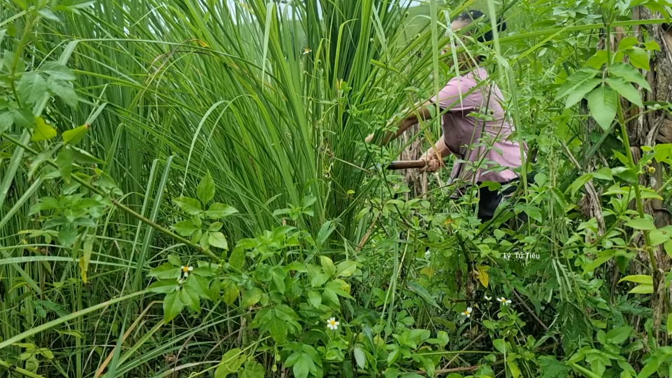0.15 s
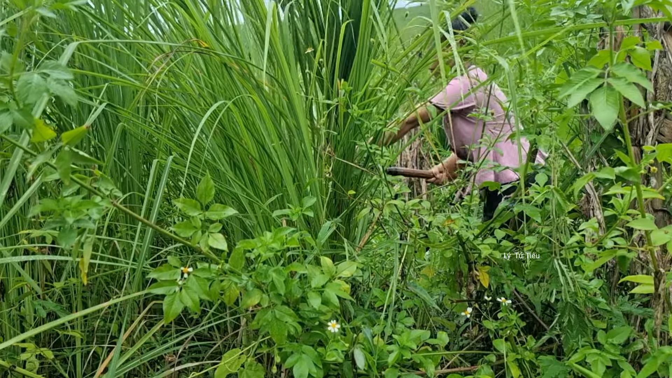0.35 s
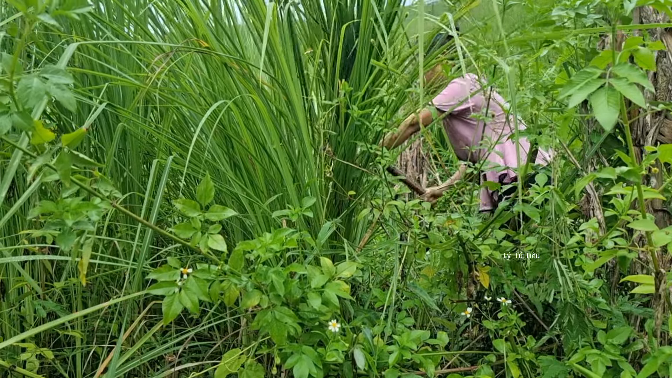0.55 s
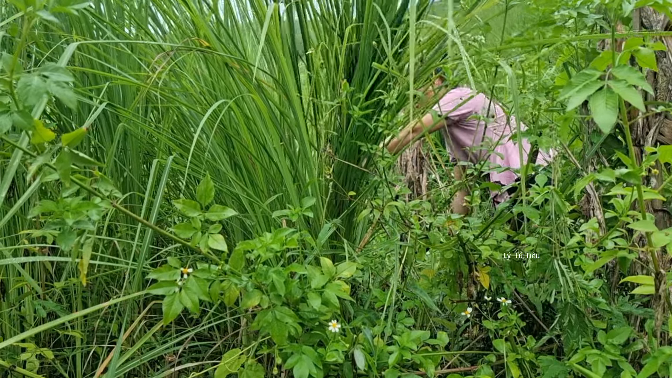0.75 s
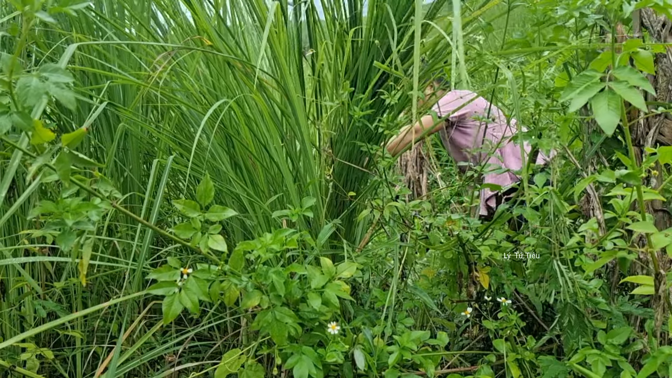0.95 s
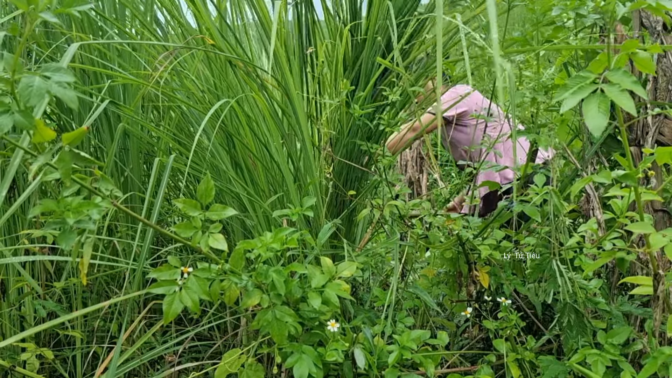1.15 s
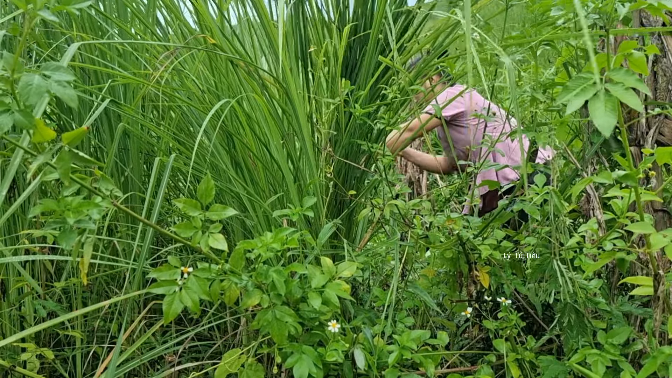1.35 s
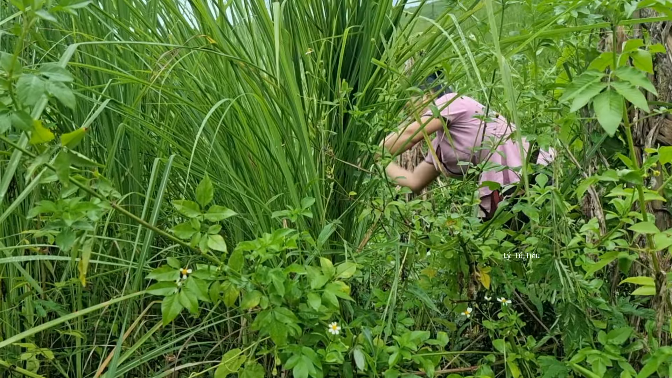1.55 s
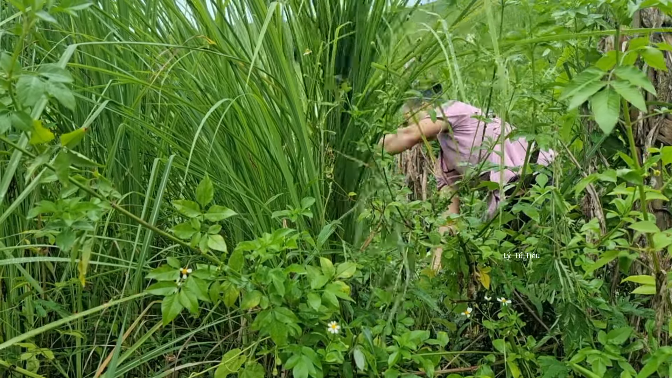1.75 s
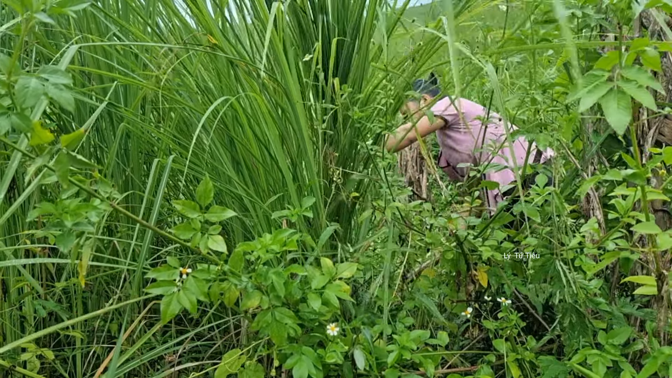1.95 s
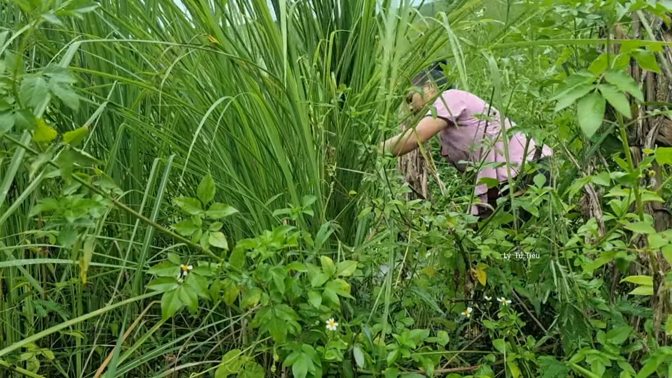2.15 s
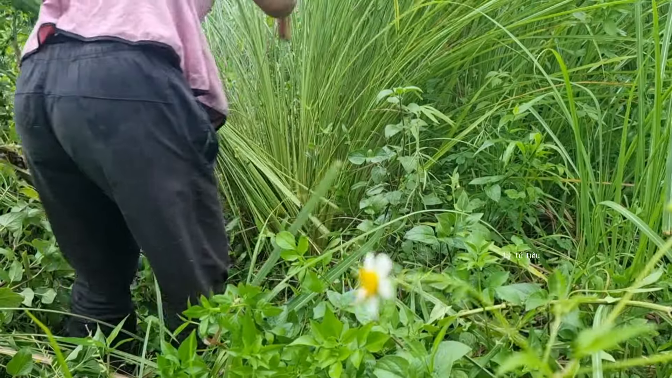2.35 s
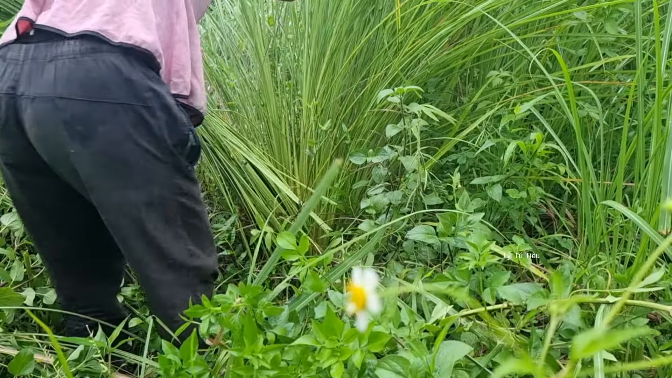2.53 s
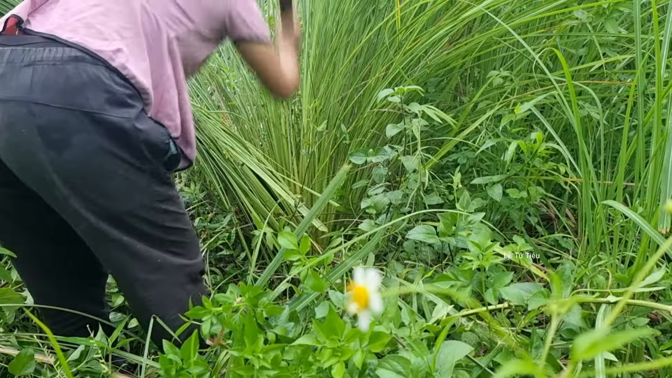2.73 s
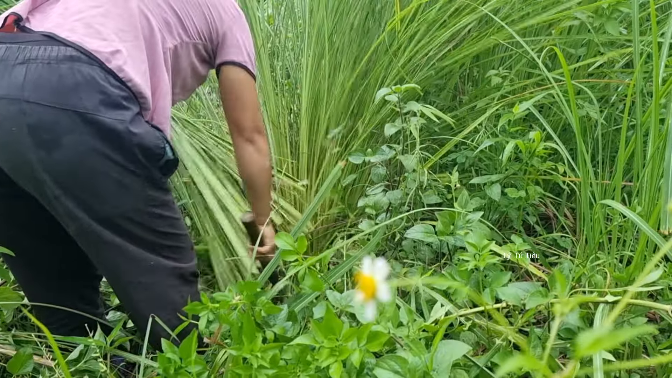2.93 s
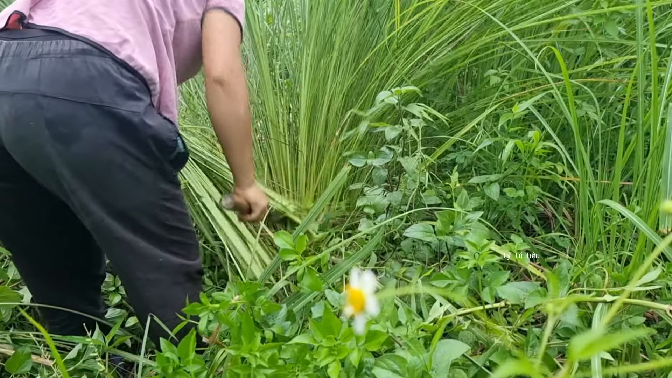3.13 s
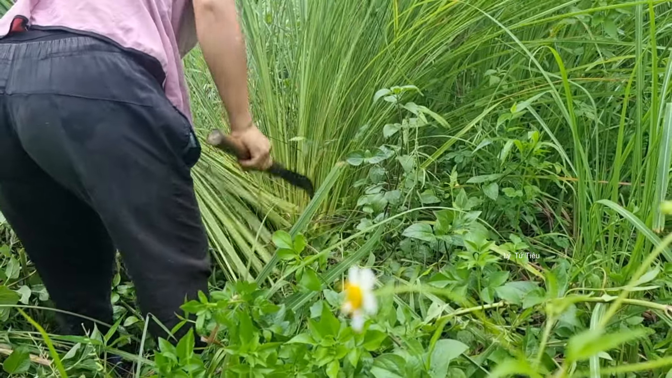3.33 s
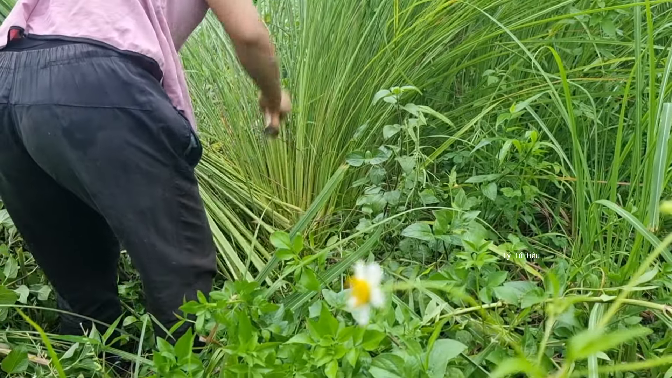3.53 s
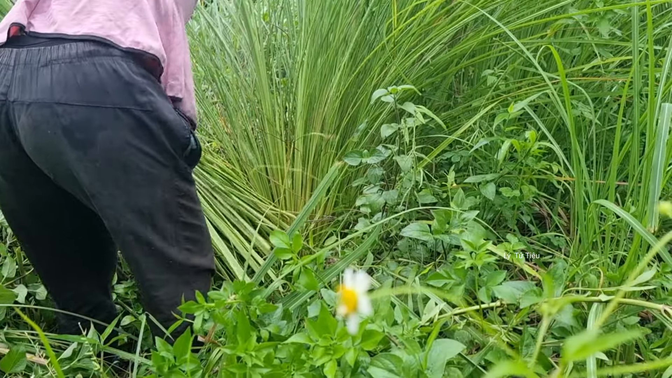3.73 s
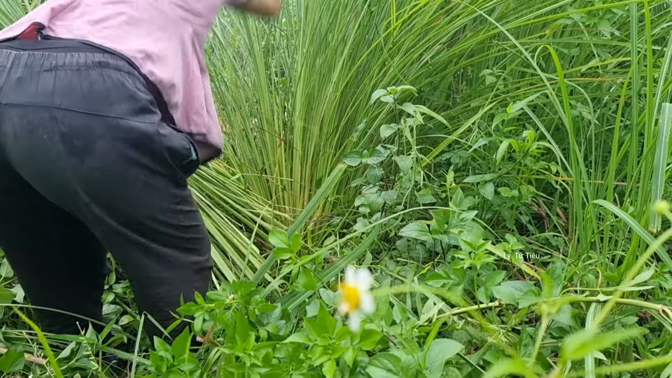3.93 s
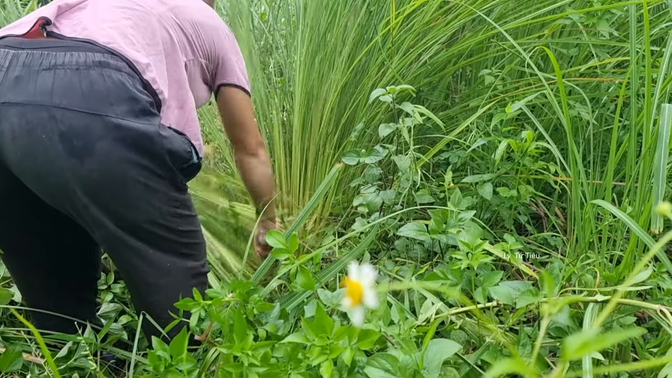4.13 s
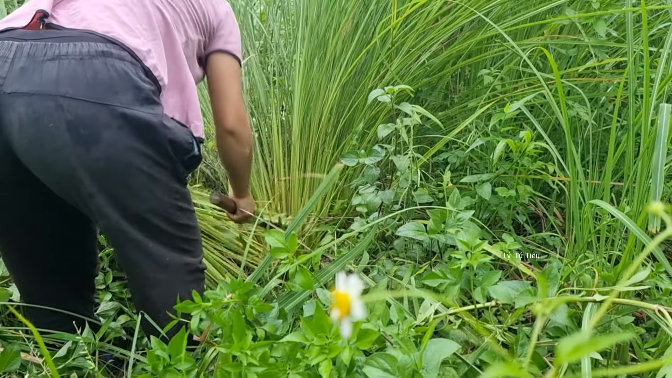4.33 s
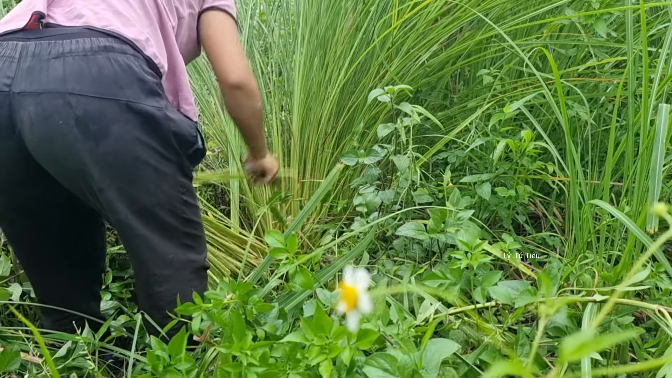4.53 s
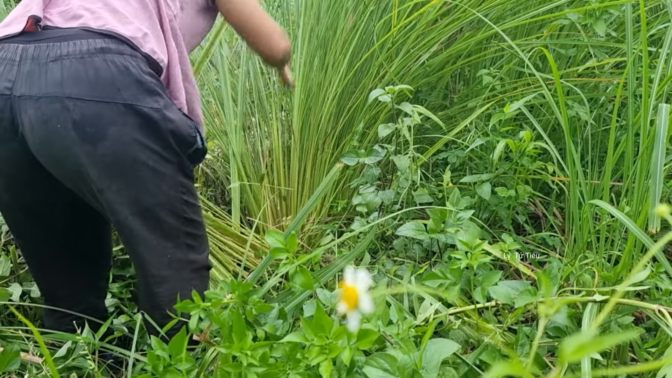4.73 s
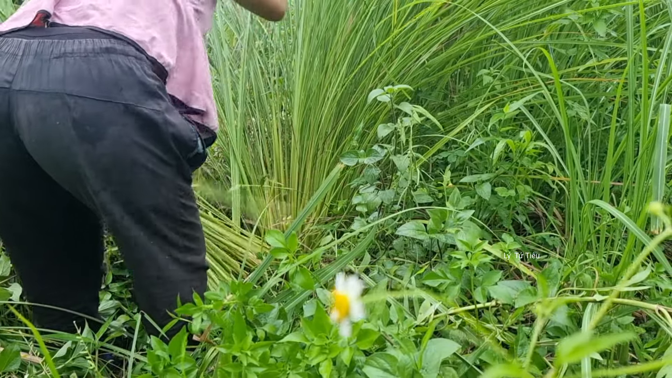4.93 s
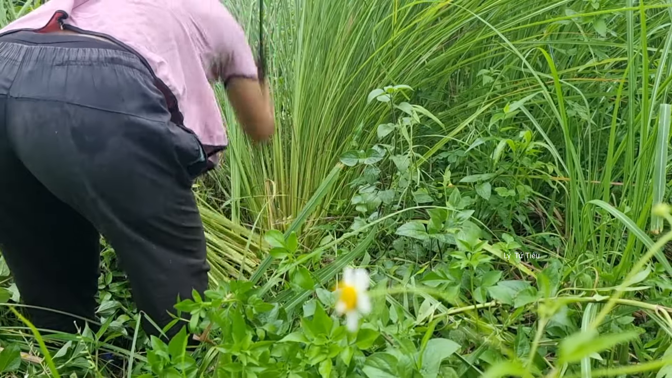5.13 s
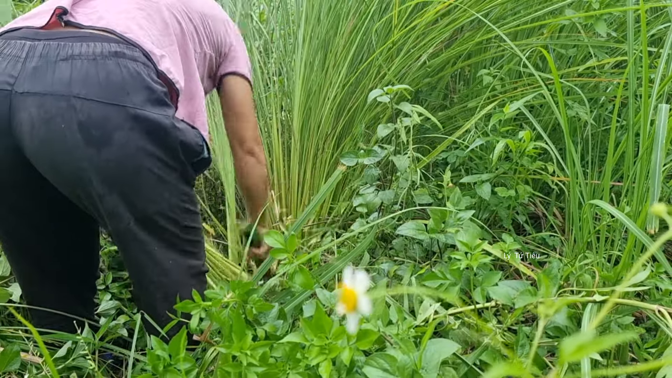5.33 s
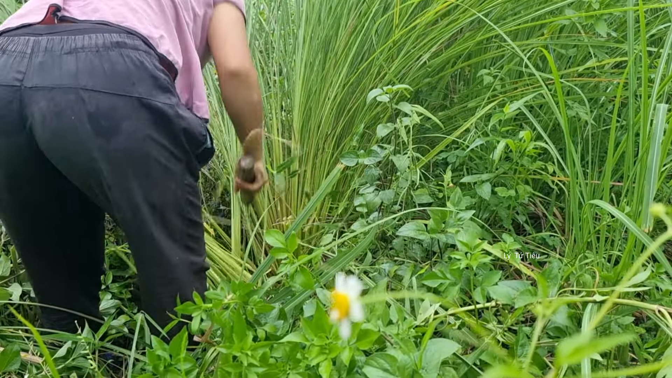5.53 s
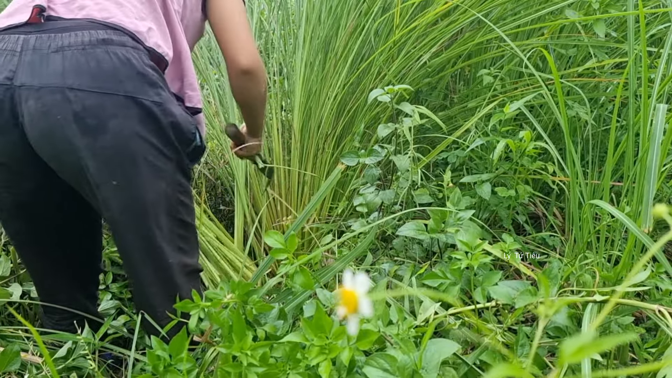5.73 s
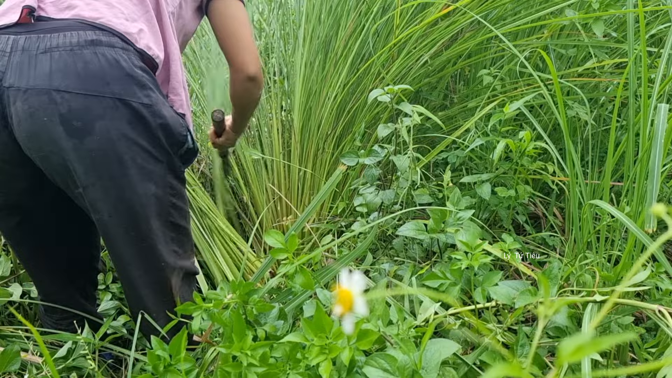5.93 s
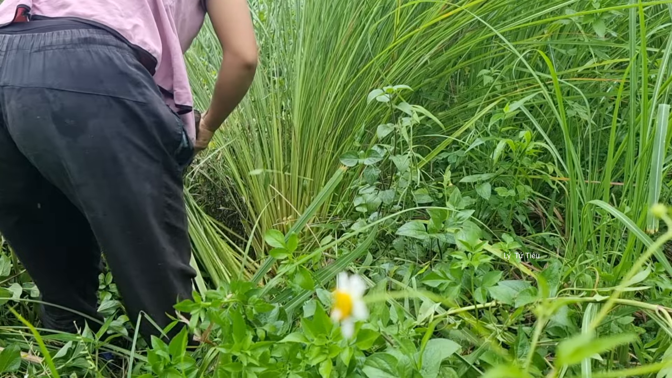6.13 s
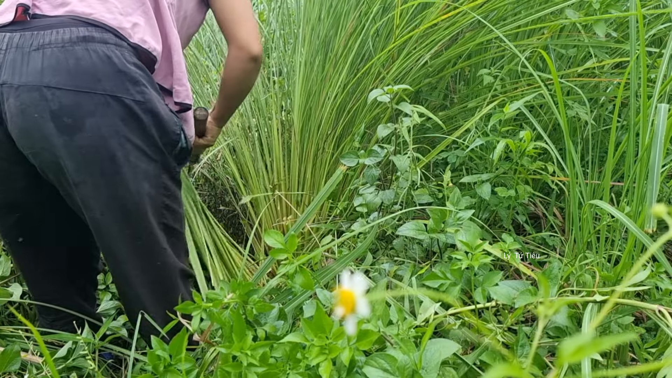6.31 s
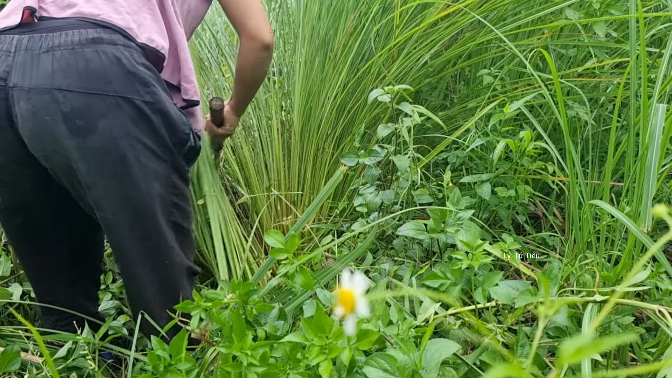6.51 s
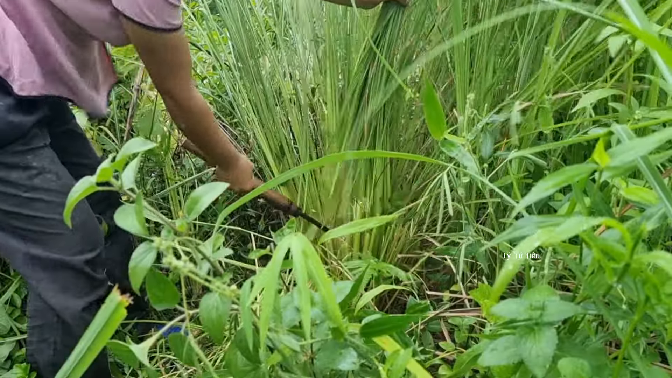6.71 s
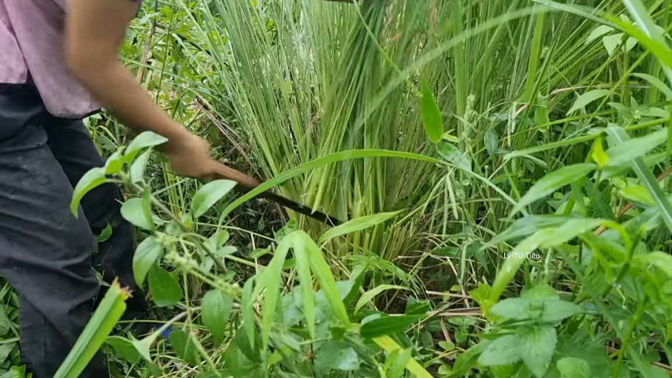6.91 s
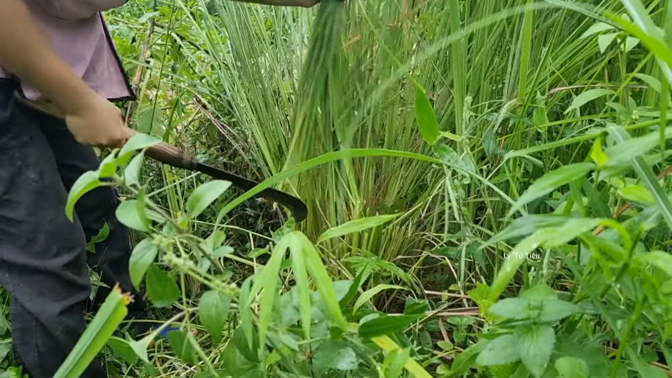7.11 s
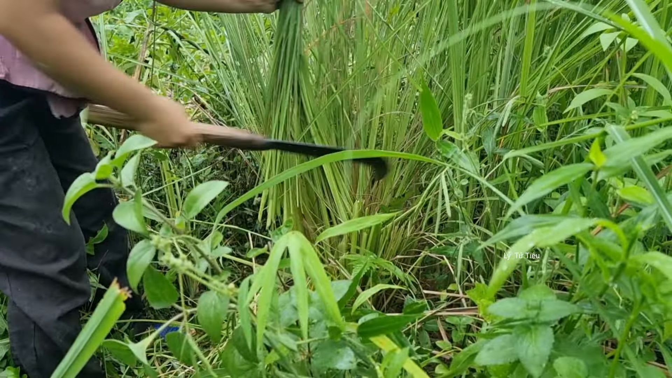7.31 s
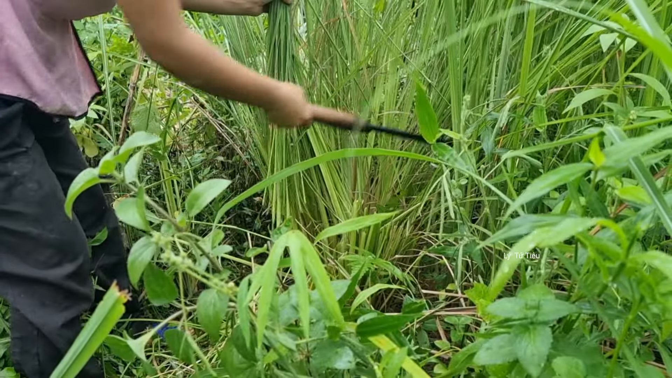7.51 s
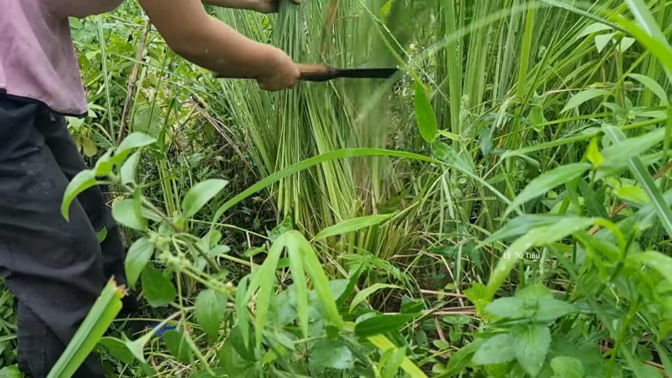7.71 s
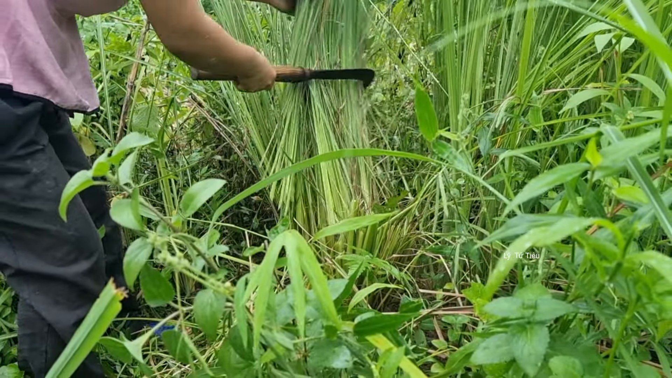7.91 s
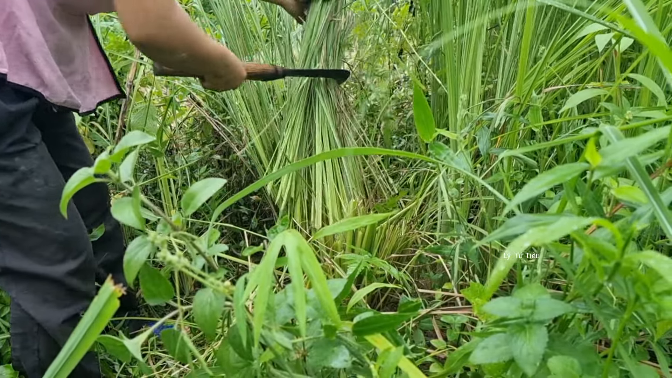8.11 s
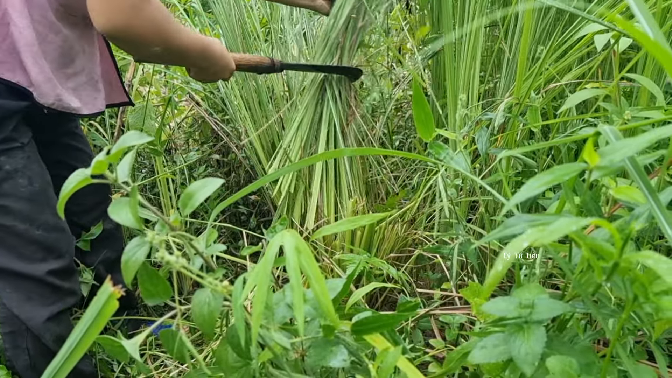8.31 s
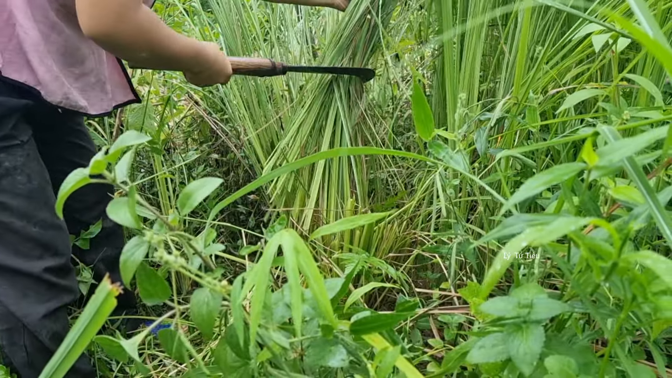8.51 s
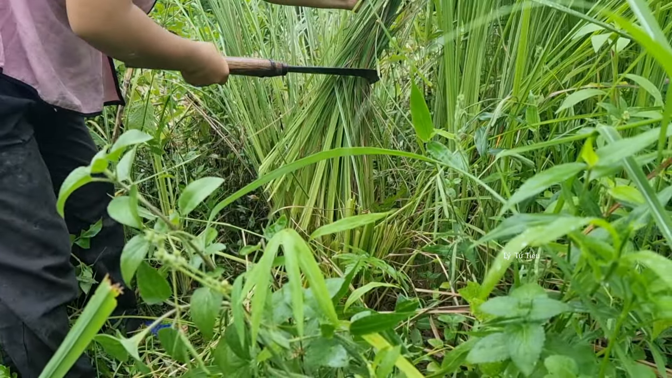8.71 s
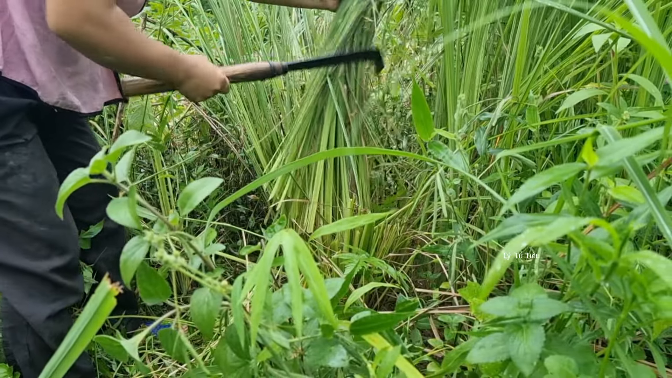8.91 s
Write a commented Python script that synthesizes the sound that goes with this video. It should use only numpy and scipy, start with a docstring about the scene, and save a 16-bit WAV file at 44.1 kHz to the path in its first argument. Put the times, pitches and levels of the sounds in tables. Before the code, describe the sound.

A blade swipes lightly, then chops hard four times into a thick clump of tall grass, with crisp rips, dull thuds and dry leafy rustling.

```python
"""A machete cuts a clump of tall grass on an open hillside: one light swipe, then four hard chops.
Each chop is made of bursts of tiny fibre cracks for the rip and the bite, ringing thuds and a dying rattle.
Snaps and a faint tick are short pitched bursts; leaves slide and stalks rub as the clump is gathered by hand.
Behind this close work the hillside hisses faintly, as slowly wavering coloured noise.
The left side is the stronger; the right is weak, dull and well out of phase."""
import sys
import numpy as np
from scipy import signal
from scipy.fft import rfft, irfft
from scipy.io import wavfile
from scipy.ndimage import uniform_filter1d

SR = 44100
rng = np.random.default_rng(int(sys.argv[2]) if len(sys.argv) > 2 else 0)


def pcm_store(signal):
    """Save signal as 16-bit PCM."""
    levels = np.round(np.clip(np.atleast_2d(signal), -1, 1) * 32767)
    wavfile.write(sys.argv[1], SR, levels.astype(np.int16).T)


N = 395136


def from_db(db):
    """Amplitude of a level in dB."""
    return 10 ** (np.asarray(db) / 20)


def rms_one(x):
    """Scale x to an rms of 1."""
    return x / np.sqrt(np.mean(x ** 2) + 1e-20)


def at_hz(points, size):
    """Each column of a table on the frequency grid of a signal of this size."""
    hz, *columns = np.transpose(points)
    grid = np.log(np.fft.rfftfreq(size, 1 / SR) + 1e-3)
    return [np.interp(grid, np.log(hz), column) for column in columns]


def colour(x, spectrum):
    """Give x a spectrum that falls away below its lowest point; rms 1."""
    level_db, = at_hz(spectrum, len(x))
    lowest_hz = spectrum[0][0]
    skirt = np.minimum(np.fft.rfftfreq(len(x), 1 / SR) / lowest_hz, 1) ** 2
    return rms_one(irfft(rfft(x) * from_db(level_db) * skirt, len(x)))


def drift(per_s, size):
    """Random wandering: straight lines between chance values of spread 1."""
    knots = rng.standard_normal(size // 20 + 2)
    position = np.arange(size) * min(per_s / SR, 1 / 20)
    return np.interp(position, np.arange(len(knots)), knots)


def cracks(per_s, spread_db, size):
    """Tiny fibre cracks at random moments, most small and a few large; rms 1."""
    strength = from_db(spread_db * np.minimum(rng.exponential(1, size), 4))
    happens = rng.random(size) < per_s / SR
    return rms_one(happens * strength * rng.choice([-1, 1], size))


def even(x, span_s):
    """A steady force keeps the power of the cracks nearly constant over this span."""
    power = uniform_filter1d(x ** 2, max(int(span_s * SR), 2))
    return x / np.sqrt(np.abs(power) + 1e-9)


def dying(t, t60):
    """Exponential decay from t = 0, losing 60 dB in t60 seconds."""
    return from_db(-60 * np.maximum(t, 0) / t60) * (t >= 0)


def add(out, start, x):
    """Mix x in from sample start."""
    x = x[:len(out) - start]
    out[start:start + len(x)] += x


def crackle(per_s, size):
    """Little stems tick against each other, each exciting one of 18 brief resonances; rms 1."""
    out = np.zeros(size)
    cycles = 24  # of ringing before a tick has lost 60 dB
    for hz in np.geomspace(2000, 8500, 18):
        w = 2 * np.pi * hz / SR
        r = np.exp(-np.log(1000) * hz / (cycles * SR))
        hits = cracks(per_s / 18, 3.2, size) + 1e-18
        ticks = signal.lfilter([1, 0, -1], [1, -2 * r * np.cos(w), r * r], hits)
        out += np.sqrt(hz) * rms_one(ticks)
    return rms_one(out)


def strokes():
    """Power of stalks and leaves: each hand stroke swells, holds while the hand moves and dies away."""
    # The hand sweeps, bends or pulls the grass:
    # start_s, length_s, stalks_rubbing_db, leaves_sliding_db
    hand_strokes = [(0.0, 0.36, -55, -67), (0.38, 0.3, -59.5, -51.5), (1.013, 0.65, -65, -84),
                    (1.91, 0.12, -58, -56), (2.19, 0.09, -63, -55.5), (2.328, 0.23, -61, -48.5),
                    (3.043, 0.17, -60, -57.5), (3.52, 0.27, -72, -59), (4.084, 0.12, -55, -56),
                    (5.195, 0.33, -56.5, -62), (5.973, 0.19, -75, -50), (6.38, 0.45, -69, -51),
                    (6.84, 0.15, -49, -50), (7.266, .1, -55.5, -56), (7.566, 0.17, -68, -51),
                    (7.73, 0.27, -57, -45.5), (8.01, 0.17, -52.5, -44), (8.702, 0.3, -55.5, -51)]
    attack_s, t60_s = 0.032, 0.4  # the leaves take up the motion, then settle
    t, power = np.arange(N) / SR, np.zeros((2, N))
    for start, length, *levels_db in hand_strokes:
        swell = np.clip((t - start) / attack_s, 0, 1)
        settle = dying(np.maximum(t - start - length, 0), t60_s)
        power += np.outer(from_db(levels_db), swell * settle + 1e-9) ** 2
    return power


def rustle():
    """Stalks rub with a papery rasp; the fine-toothed leaf edges hiss over each other and stems tick."""
    # How much the held clump keeps stirring: time_s, level_db
    stir_points = [(0.0, -51), (0.67, -51), (1.1, -61.5), (2.39, -48.5), (2.7, -57.5), (3.02, -52.5),
                   (4.02, -64.5), (4.29, -50), (4.59, -62.5), (6.44, -55), (6.64, -53), (7.58, -49),
                   (7.99, -45.5), (8.28, -46), (8.96, -44)]
    # Spectrum of rubbing stalks: pitch_hz, level_db (per Hz)
    stalk_spectrum = [(150, -14), (400, -1.5), (800, -6), (1250, 0), (1700, -1), (2200, -4.5), (2900, 0),
                      (4200, -6), (7000, -6), (15000, -19)]
    # Spectrum of sliding leaves: pitch_hz, level_db (per Hz)
    leaf_spectrum = [(800, -22), (2000, -9.5), (3500, -7), (5000, -7.5), (7400, -4), (8400, 1.5), (9200, 0),
                     (10200, -3.5), (14000, -2)]
    stir_db = np.interp(np.arange(N) / SR, *np.transpose(stir_points))
    # stalks follow 0.82 of the swing of the stir in dB; leaves follow all of it
    stalks_db = -60.5 + 0.82 * (stir_db - stir_db.mean())
    leaves_db = -1 + stir_db
    resting = from_db([stalks_db, leaves_db])
    clumping = from_db(0.34 * drift(16, N))
    rubbing, sliding = np.sqrt(resting ** 2 + strokes()) * clumping

    stalks = colour(cracks(9000, 2.65, N), stalk_spectrum)
    stalks_uneven = from_db(1.7 * drift(35, N))
    ticks = from_db(-9) * crackle(800, N)
    leaves = colour(cracks(26000, 3.2, N), leaf_spectrum) + ticks
    leaves_uneven = from_db(1.13 * drift(60, N))
    return stalks * stalks_uneven * rubbing + leaves * leaves_uneven * sliding


def hillside():
    """Faint, distant outdoor air: coloured noise, never quite steady."""
    # Spectrum of the open air: pitch_hz, level_db (per Hz)
    air_spectrum = [(35, -25), (55, -5), (85, 1), (170, 1), (280, -6.5), (520, -9.5), (780, -4), (1200, -7),
                    (1700, -11), (2900, -13), (4500, -23), (7000, -23.5), (8600, -19.5), (10300, -26.5)]
    level_db = -57 - 1.13 * drift(4.54, N)
    return from_db(level_db) * colour(rng.standard_normal(N), air_spectrum)


def crunch(spectrum, size):
    """Cracks under a steady push: fibres of each thickness give way at an even rate."""
    whole, out = rfft(colour(cracks(7000, 2.2, size), spectrum)), np.zeros(size)
    hz = np.fft.rfftfreq(size, 1 / SR)
    edges_hz = [0, 300, 700, 1500, 3000, 6000, SR / 2]
    for low, high in zip(edges_hz, edges_hz[1:]):
        band = irfft(whole * (hz >= low) * (hz < high), size)
        out += np.std(band) * even(rms_one(band), max(2 / (high - low), 0.003))
    return out


def chop(t, row, stalk_tone):
    """One blow tears leaves, bursts stalks and jars the base; t = 0 where the blade is deepest."""
    # Spectrum of tearing leaves: pitch_hz, level_db (per Hz)
    rip_spectrum = [(150, -0.5), (400, -4), (1200, -1), (3000, -0.5), (5000, -4), (8500, -1.5),
                    (10500, -10.5), (15500, -7.5)]
    # Spectrum of the shaken leaves: pitch_hz, level_db (per Hz)
    shake_spectrum = [(200, -6.5), (500, -2.5), (1300, -1.5), (2100, -6), (3400, -4), (5800, -5),
                      (8700, 1.5), (10200, -4.5), (13000, 1), (15500, -5)]
    # Ringing of the rooted base: multiple_of_thud_hz, level_db, t60_s
    base_modes = [(1, 1.5, 0.093), (3.5, 8, 0.03), (5.5, -2, 0.041)]
    _, lead, bite_db, half, rip_db, rip_t60, shake_db, shake_t60, thud_db, thud_hz = row
    size = len(t)

    # the edge meets ever more leaves on its way in, rising by 12 dB, then slows
    touch = np.clip((t + lead) / 0.0046, 0, 1)
    entering = from_db(-12 * np.clip(-t / lead, 0, 1)) * touch * (t < 0)
    rip = crunch(rip_spectrum, size) * (entering + dying(t, rip_t60))

    # the packed stalks burst around the deepest point
    burst = np.clip(1 + t / lead, 0, 1) / (1 + (t / half) ** 2)
    bite = crunch(stalk_tone, size) * burst

    # the jolted leaves go on rattling against each other
    grains = colour(cracks(10000, 2.8, size), shake_spectrum)
    rattle = grains + from_db(-6) * crackle(650, size)
    shake = even(rattle, 0.021) * dying(t, shake_t60) * np.clip(t / 0.003, 0, 1)

    # the rooted base takes the blow
    thud = np.zeros(size)
    for multiple, mode_db, t60 in base_modes:
        thud += from_db(mode_db) * np.sin(2 * np.pi * multiple * thud_hz * t) * dying(t, t60)
    thud *= np.clip(t / 0.0089, 0, 1)

    leaves = from_db(rip_db) * rip + from_db(shake_db) * shake
    return leaves + from_db(bite_db) * bite + from_db(thud_db) * thud


def machete():
    """All the blows, each biting into stalks with a tone of their own."""
    # Blows: deepest_s, lead_in_s, bite_db, half_length_s (bite at half amplitude), rip_db, rip_t60_s,
    # shake_db, shake_t60_s, thud_db, thud_hz
    blows = [(0.825, 0.083, -38, 0.011, -40.5, 0.2, -48, 0.89, -75, 120),
             (1.738, 0.016, -14.5, 0.0049, -27, 0.19, -29, 0.58, -30.5, 75.4),
             (2.913, 0.017, -12, 0.0018, -21.5, 0.17, -33.5, 0.5, -44, 83),
             (4.197, 0.019, -14.5, 0.0026, -21.5, 0.16, -34, 0.8, -36, 110),
             (5.292, 0.019, -20, 0.0048, -22, 0.095, -39.5, 0.53, -31, 96)]
    # Tone of the stalks under each blow, one spectrum a blow: pitch_hz, level_db (per Hz)
    stalk_tones = [
        [(150, -59), (250, -19), (899, 5.5), (1030, 0), (1140, -2), (5640, 0), (14000, -10)],
        [(135, -42), (225, 3.5), (527, 0), (706, 3.5), (787, 4), (1020, -24), (1130, 1), (1410, -12), (1750, 1),
         (3260, -5), (4440, -14), (4960, -8.5), (8410, -21), (10300, -28), (14000, -23)],
        [(140, -40), (215, -4.5), (473, -6.5), (588, -20), (787, -2), (1490, -17), (2180, 4), (2440, -12),
         (2770, -2), (3140, -13), (3320, -2.5), (4610, -18), (5140, -8.5), (8250, -13), (14000, -21)],
        [(110, -54), (180, -14), (264, -3), (328, -20), (424, 4), (719, -15), (802, -11), (1110, -3.5),
         (1290, 7), (2440, -23), (2720, 1), (3840, -10), (4130, -5), (8250, -13), (14000, -20)],
        [(110, -26), (180, 5.5), (284, -10), (759, 6), (847, 2), (1540, -5), (1720, -21), (1920, -24),
         (2480, -17), (2620, -10), (4360, -10), (4780, 1.5), (8720, -9), (10100, -19), (14000, -25)],
    ]
    out, t = np.zeros(N), np.arange(SR) / SR - 0.1
    for row, stalk_tone in zip(blows, stalk_tones):
        add(out, int((row[0] + t[0]) * SR), chop(t, row, stalk_tone))
    return out


def snaps_and_tick():
    """Each is a dying run of cracks, shaped round a pitch of its own and at most 0.2 s long."""
    # Single stalks snapping, save for 3.714 s, which is a faint short pitched tick at 8400 Hz:
    # start_s, level_db, pitch_hz, t60_s, ring_db (pitch against its near surroundings)
    pitched_bursts = [(0.77, -44.5, 1570, 0.19, -3), (1.703, -48.5, 3100, 0.18, -3),
                      (1.917, -47, 3000, 0.11, 3), (1.946, -39.5, 1700, 0.031, 1),
                      (2.972, -42.5, 3300, 0.24, 21), (2.998, -31.5, 8250, 0.044, 6),
                      (3.164, -45, 5200, .04, 12), (3.310, -41, 8200, .025, 5),
                      (3.34, -40.5, 3840, 0.029, 11), (3.461, -45.5, 4100, 0.017, 20),
                      (3.714, -46.5, 8400, 0.062, 24), (3.973, -44, 2600, 0.027, 12),
                      (4.076, -42, 2240, 0.043, -2), (4.098, -39.5, 2750, 0.021, 9),
                      (4.113, -45, 4500, 0.037, 5), (4.157, -41, 6200, 0.16, 8),
                      (4.259, -31.5, 8200, .025, 9), (4.281, -34.5, 4330, 0.034, 11),
                      (4.321, -40, 3000, 0.056, 7), (4.362, -40.5, 6140, 0.099, 10),
                      (4.916, -44.5, 1185, 0.081, 21), (4.917, -44.5, 4200, 0.039, 8),
                      (4.932, -44, 4000, 0.065, 8), (4.970, -45, 6400, .035, 3),
                      (5.038, -39, 4470, 0.034, 2), (5.053, -40, 4250, 0.079, 6),
                      (5.214, -41.5, 3100, 0.038, -2), (5.454, -44, 2800, 0.035, 5),
                      (5.506, -46.5, 13200, 0.2, 4), (5.952, -46, 8300, 0.12, 5),
                      (6.105, -43, 3400, 0.034, 14), (7.048, -41, 3000, .02, 1),
                      (7.182, -35.5, 1980, 0.013, -2), (7.297, -37, 3030, 0.021, -12),
                      (8.725, -44, 2760, 0.97, 0)]
    out, t = np.zeros(N), np.arange(SR // 5) / SR
    width = 1.18  # frequency ratio from the pitch to its surroundings
    for start, level_db, hz, t60, ring_db in pitched_bursts:
        tone = [(hz / 4, -13), (hz / width, 0), (hz, ring_db), (hz * width, 0), (hz * 4, -11)]
        burst = even(colour(cracks(7000, 3.5, len(t)), tone), 0.002)
        add(out, int(start * SR), from_db(level_db) * burst * dying(t, t60))
    return out


def foliage(x):
    """Nearby leaves and stems throw back 24 faint echoes of the higher pitches within 10 ms."""
    count = 24
    echoes = np.zeros(SR // 100)
    echoes[rng.integers(SR // 1000, len(echoes), count)] = rng.standard_normal(count)
    echoes /= np.linalg.norm(echoes)
    bright = signal.sosfilt(signal.butter(1, 900, "high", fs=SR, output="sos"), x)
    return x + from_db(-14) * signal.fftconvolve(bright, echoes)[:N]


def ports(x):
    """Two microphone ports: the right is weak, dull and well out of phase, with a small diffuse part."""
    # Right port against left: pitch_hz, shared_db, phase_rad, unshared_db
    port_response = [(85, -37, 2.5, -37), (130, -29, 2.6, -40), (215, -15, 2.1, -34), (310, -9, 2.8, -48),
                     (510, -7.5, 2.75, -16), (1200, -9.5, 2.24, -29), (2470, -14, 1.85, -29),
                     (4800, -17.5, 1.6, -39), (9700, -28.5, 1.8, -25), (15000, -40, 2.5, -34)]
    shared_db, phase, own_db = at_hz(port_response, N)
    shared = from_db(shared_db) * np.exp(1j * phase)
    # the shared sound keeps the spectrum of x in the mean of both sides
    left = 2 * rfft(x) / np.abs(1 + shared)
    # the diffuse part follows the same loudness with scrambled phase
    diffuse = rfft(irfft(left, N) * rms_one(drift(200, N)))
    right = left * shared + from_db(own_db) * diffuse
    return irfft(np.array([left, right]), N)


def scene():
    """The close work is heard through the undergrowth, over the open air."""
    work = rustle() + machete() + snaps_and_tick()
    return ports(foliage(work) + hillside())


def record(dry):
    """The highest peaks are rounded, then the top is cut above 15600 Hz."""
    rounded = np.tanh(dry)
    top_cut = signal.ellip(12, 0.1, 80, 15600, fs=SR, output="sos")
    return signal.sosfilt(top_cut, rounded)


dry = scene()
out = record(dry)
pcm_store(out)
```